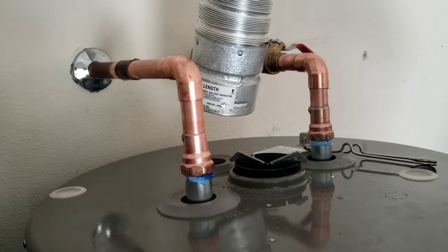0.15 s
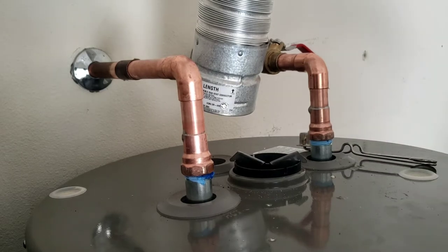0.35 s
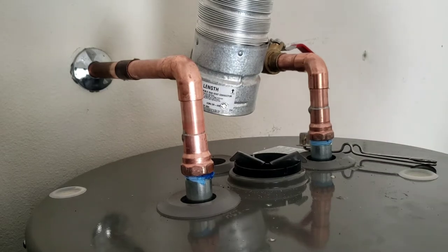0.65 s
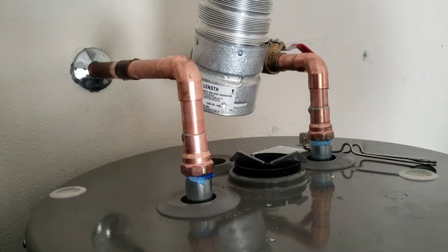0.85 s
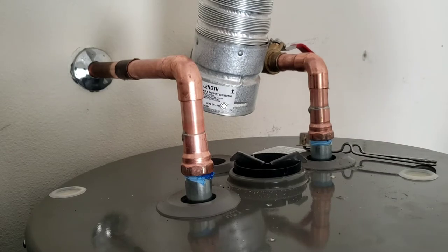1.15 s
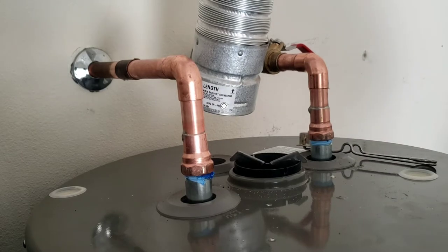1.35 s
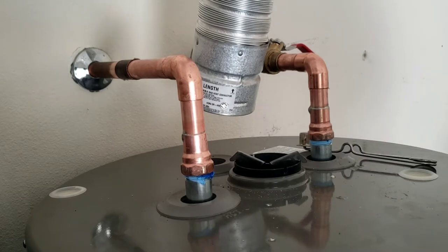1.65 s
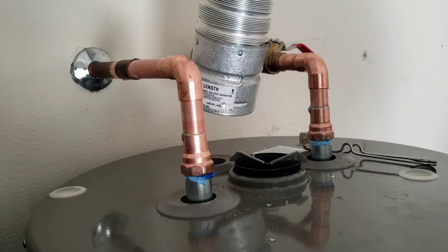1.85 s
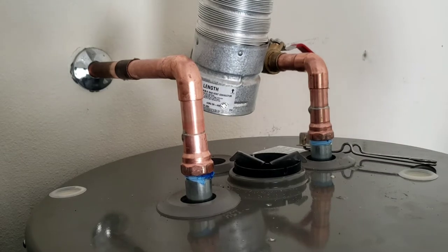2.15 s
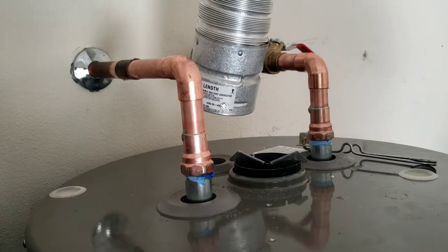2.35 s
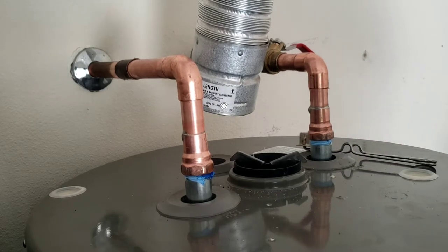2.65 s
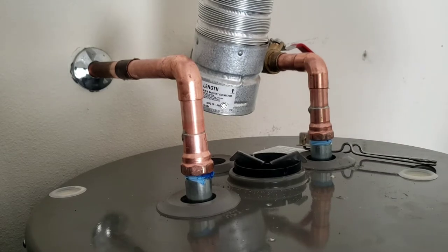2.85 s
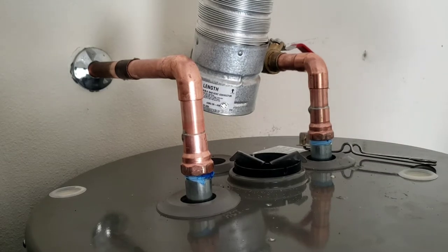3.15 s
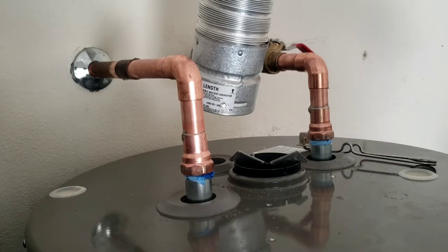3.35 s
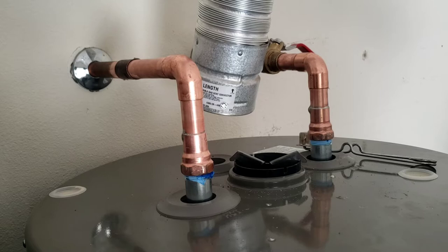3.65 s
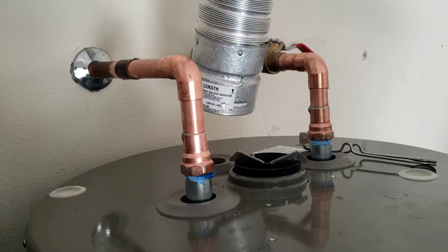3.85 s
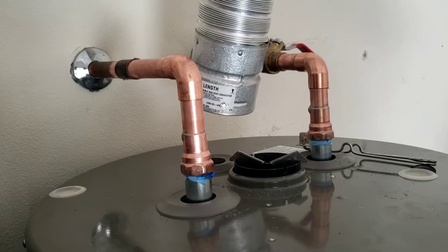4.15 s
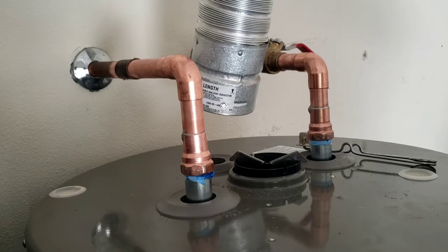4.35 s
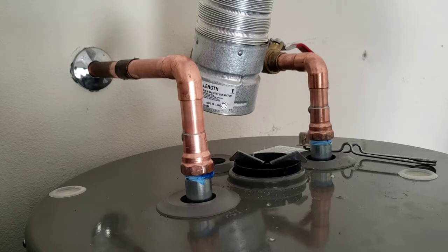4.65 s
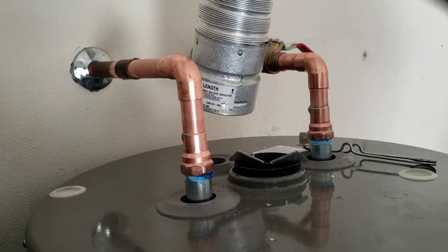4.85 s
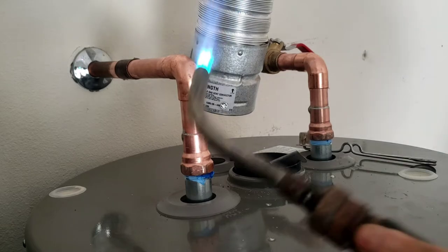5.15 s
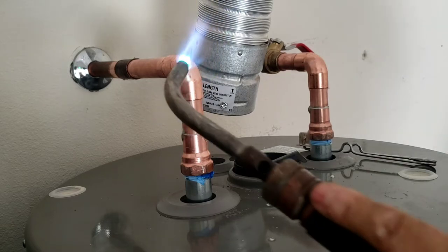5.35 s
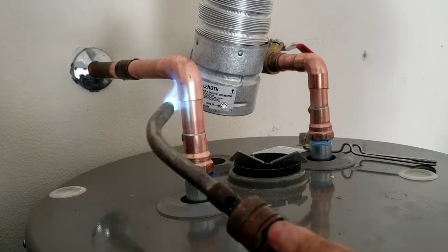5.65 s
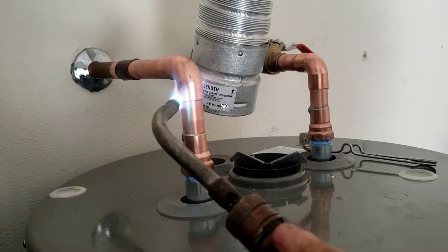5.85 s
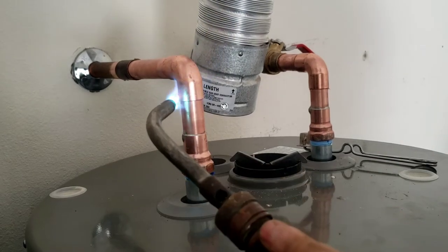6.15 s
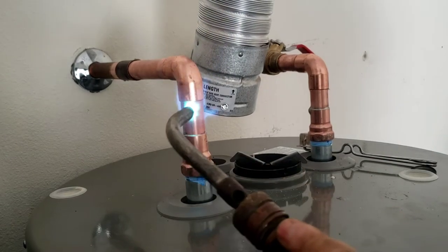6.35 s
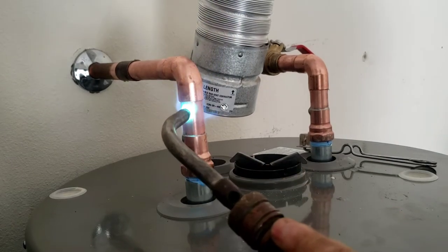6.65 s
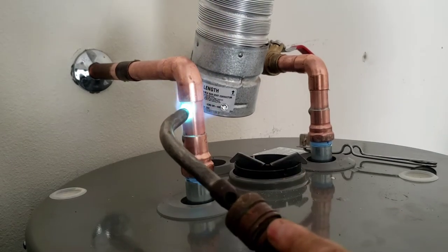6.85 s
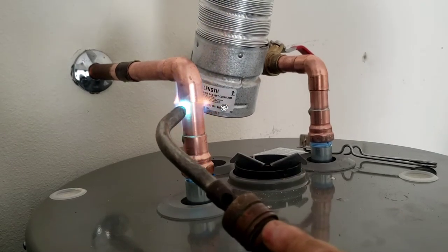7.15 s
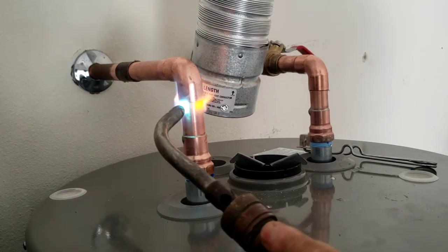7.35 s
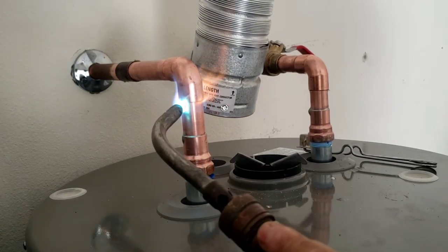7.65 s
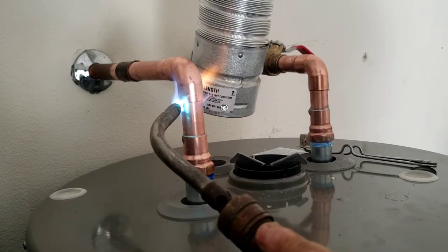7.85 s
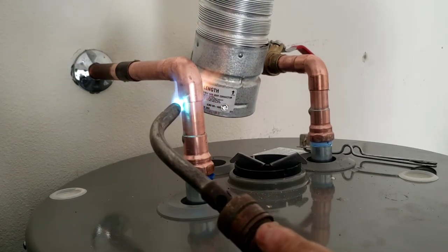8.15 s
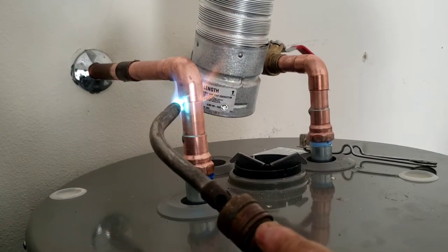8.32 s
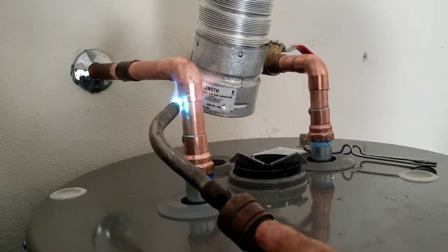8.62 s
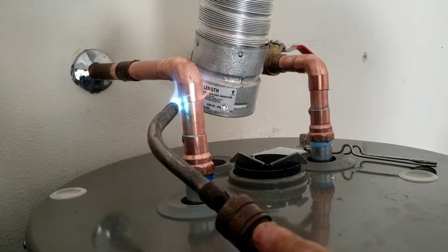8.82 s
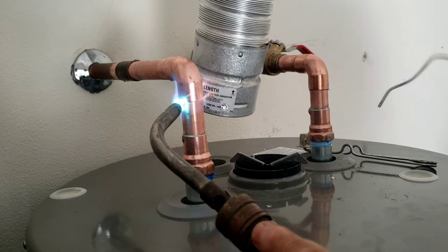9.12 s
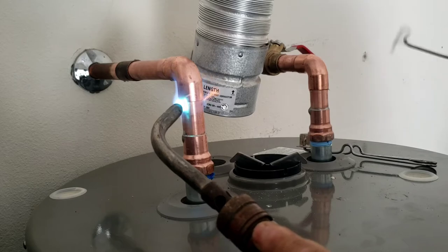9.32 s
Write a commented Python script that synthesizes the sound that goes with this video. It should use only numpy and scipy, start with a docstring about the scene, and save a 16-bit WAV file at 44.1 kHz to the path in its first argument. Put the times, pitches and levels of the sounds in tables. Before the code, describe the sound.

Close to the microphone in a cramped closet, a gas torch gives a continuous bright hiss with an unsteady whistle on top. Midway the flame flutters and roars hollowly for a moment as the torch moves, and a second, higher whistle flares. It then settles on a copper pipe, hissing on with a stronger, pulsing whistle and frequent soft low puffs.

```python
"""A hand gas torch burns in a small hard-walled closet, heard at two microphone ports with unlike treble. First
it is held aside to the right: the jet hisses through the resonances of the burner tube, which whistles near 3.2
kHz, and low noise flickers below. At about 5 s it swings in: the flame roars hollow, and a second whistle
flares. From 5.7 s it plays on a copper pipe: the hiss has a new colour, the main whistle is louder and the low
puffs come closer together."""
import sys
import numpy as np
from scipy import signal
from scipy.fft import rfft, irfft
from scipy.io import wavfile
from scipy.ndimage import uniform_filter1d, map_coordinates

SR = 44100
rng = np.random.default_rng(int(sys.argv[2]) if len(sys.argv) > 2 else 0)


def to_wav(s):
    """Save 16-bit WAV."""
    ch = np.atleast_2d(s).T  # columns
    pcm = np.round(np.clip(ch, -1, 1) * 32767)  # PCM
    wavfile.write(sys.argv[1], SR, pcm.astype(np.int16))


N = 418058
HZ = np.maximum(np.fft.rfftfreq(N, 1 / SR), 1)
SPLIT = np.array([[.5], [-.5]])   # halves a left-over-right difference between the ports


def jet(way):
    """Hiss through tube and surface resonances; the colour crossfades from aside (way 0) to pipe (1)."""
    # jet spectrum: freq_hz, level_db
    aside_spectrum = [(390, -21), (805, -18), (1120, -12.5), (1350, -15), (2580, -7.5), (3230, -7.5),
                      (4570, -10.5), (7190, -8), (8750, -13.5), (11800, -9), (14400, -21)]
    pipe_spectrum = [(390, -11), (965, -14.5), (1270, -12.5), (1590, -11), (2820, -9), (3130, -8.5),
                     (3540, -13), (4300, -9.5), (10000, -14.5), (11500, -7.5), (14400, -25.5)]
    # resonances of tube and nearby surfaces: freq_hz, width_hz, lift_db
    aside_peaks = [(1130, 130, 5), (1750, 140, 2), (2260, 200, 4), (2580, 150, -3), (2860, 70, 4),
                   (3030, 120, -2), (3200, 90, 4), (3330, 150, 3), (4100, 120, 3), (5380, 150, 3),
                   (6000, 150, 3), (6650, 250, -3), (7120, 270, 6), (8900, 600, -4), (9650, 400, 3),
                   (12150, 500, 2.5)]
    pipe_peaks = [(560, 60, 3), (1250, 170, 5), (1600, 130, -5), (2040, 90, 3), (2240, 100, 4),
                  (2600, 250, -4), (2980, 150, 3), (3110, 70, -5), (4258, 75, 7), (4650, 80, 3),
                  (5050, 80, 4), (5500, 150, 2), (6120, 150, 2), (6420, 100, 2), (7110, 150, 4),
                  (8600, 600, -3), (9780, 150, 4)]
    # port balance: freq_hz, left_over_right_db
    aside_pan = [(490, 17), (750, 4), (1140, -3.5), (1740, 3), (2660, -5), (4050, 0.5), (6170, -3),
                 (9400, 6.5), (14300, 4)]
    pipe_pan = [(490, 4), (750, 2), (1140, 2.4), (1740, 0.43), (2660, 0.5), (4050, 3.1), (6170, 1.8),
                (9400, 6.6), (14300, 8.1)]
    # resonances at one port only, left then right: freq_hz, width_hz, lift_db
    aside_port_peaks = ([(800, 110, -10.5), (2920, 250, 1.5), (4300, 150, -0.5), (5200, 300, 2.5),
                        (5840, 300, 4)], [(560, 160, -5.5), (716, 87, 6), (2550, 230, -9.5),
                        (4320, 81, 4.5), (4920, 490, 4.5), (5740, 200, 3)])
    pipe_port_peaks = ([(1360, 160, 3.5), (3500, 200, 5), (10900, 1200, -1), (13800, 600, 6.5)],
                       [(534, 130, 4), (1600, 140, -1), (11900, 500, 0), (12900, 700, 1)])
    hiss = turbulence(flicker_db=.4)
    aside = resonate(hiss * np.sqrt(1 - way), aside_spectrum, aside_peaks, aside_pan, aside_port_peaks)
    at_pipe = resonate(hiss * np.sqrt(way), pipe_spectrum, pipe_peaks, pipe_pan, pipe_port_peaks)
    return aside + at_pipe


def turbulence(flicker_db):
    """Jet noise in three flickering bands. Rows: direct sound, late sound left, late sound right."""
    # jet level and trims of its outer bands: time_s, level_db, sizzle_db, roar_db
    levels = [(0, -32.5, -3, -6), (.6, -33.5, -2, -5.5), (.95, -32, -1, -5), (1.5, -30.5, 0, -4.5),
              (1.8, -30.5, -1.5, -6), (2.1, -30, -1, -5), (2.5, -30.5, -1, -4), (3, -31, -1.5, -4.5),
              (3.3, -30.5, -1.5, -5), (3.7, -31.5, -1.5, -3.5), (4, -30, -2, -6), (4.2, -30, -1.5, -5),
              (4.5, -29.5, -2.5, -6), (4.9, -30, -2, -4), (4.99, -29.5, -2, -3), (5.12, -26.5, -2.5, -4),
              (5.19, -26.5, -3, -5), (5.27, -29, -5, -4.5), (5.36, -28, -3.5, -5.5), (5.42, -31, -4, -5),
              (5.6, -31, -4.5, -6), (6.2, -30, -3.5, -7), (7.0, -30, 0, -8.5), (7.6, -30.5, -1, -7),
              (8, -31, -1.5, -7), (8.4, -31, -0.5, -6.5), (8.9, -30, -2.5, -8), (9.48, -29.5, -0.5, -9.5)]
    level_db, sizzle_db, roar_db = in_time(levels)
    white = rfft(rng.standard_normal((3, N)))
    low = 1 / (1 + (HZ / 2900) ** 8)
    high = 1 / (1 + (8200 / HZ) ** 16)
    bands = [(low, roar_db - np.median(roar_db)), (1 - low - high, 0),
             (high, sizzle_db - np.median(sizzle_db))]
    noise = sum(irfft(white * band, N) * from_db(db + flicker_db * drift(23)) for band, db in bands)
    return from_db(level_db) * noise


def resonate(hiss, spectrum, peaks, pan, port_peaks):
    """Colours the hiss for one torch position. Axes: direct/late, port, sample."""
    colour = from_db(at_hz(spectrum) + bumps(peaks)) / (1 + (450 / HZ) ** 16)
    colour /= np.sqrt(np.mean(colour ** 2 * (HZ > 3500) * (HZ < 8000)))
    right_cavity_db = bumps([(11500, 3100, 19.6)])
    colour = colour * from_db((at_hz(pan) - right_cavity_db) * SPLIT)
    colour *= from_db([bumps(port) for port in port_peaks])
    source = rfft(hiss)
    return np.array([irfft(source[0] * colour, N), irfft(source[1:] * colour, N)])


def whistle(way, pipe_waver_hz, unrest, unrest_hz=24):
    """Tube mode pushed by turbulence; each port adds restless echoes of its own, more from aside."""
    # mode pitch: time_s, pitch_hz
    pitch = [(0, 3170), (.5, 3180), (.8, 3210), (1.3, 3180), (1.7, 3192), (2.3, 3172), (2.8, 3185),
             (4.2, 3186), (5.0, 3200), (5.3, 3175), (5.8, 3208), (6.3, 3204), (6.6, 3212), (7.4, 3220),
             (7.9, 3197), (8.4, 3202), (8.8, 3212), (9.48, 3214)]
    # mode at the ports: time_s, level_db, left_over_right_db, left_lead_rad
    levels = [(0, -31, 2, 2.5), (.25, -29, 0, 2.3), (.5, -29.5, 6, -3.5), (.75, -32, -3, 0),
              (.95, -34, -2, -3.7), (1.15, -34, 12, -2), (1.3, -33, 5, -2.5), (1.5, -27, 9, -6),
              (1.7, -32, 5, -5), (1.9, -31, 6, -4), (2.1, -28, 2, -6), (2.35, -34, 6, -4.5),
              (2.7, -32.5, 7, -4.5), (3.3, -27, -2, -2.5), (3.6, -34, 7, -3), (3.9, -24, 6, -2.5),
              (4.1, -30, -9, -2.5), (4.3, -28, 6, -2.5), (4.5, -27, 4, 1.5), (4.75, -24.5, 3, 2.5),
              (4.9, -27, -1, 2.5), (5.05, -29, 11, 1), (5.3, -26.5, 6, 3.5), (5.55, -32, 6, 3),
              (5.72, -22, 5, 1.5), (6.0, -23.5, 5, 2.5), (6.3, -21, 4.5, 2), (6.75, -24, 8, 1.5),
              (6.9, -27.5, 9.5, 2.5), (7.4, -21, 3.5, 2), (7.75, -23, 5.5, 3), (8.2, -28.5, 9.5, 2),
              (8.5, -21.5, 5, 3), (9.05, -26, 5, 2), (9.48, -23.5, 5.5, 1.5)]
    # strongest swells: middle_s, length_s, level_db
    swells = [(1.32, 0.033, -22), (1.59, 0.03, -23.5), (1.8, 0.02, -23), (1.96, 0.028, -19.5),
              (2.06, 0.034, -25), (4.63, .04, -27), (5.02, .1, -25), (5.19, 0.039, -27), (5.36, .03, -28),
              (5.68, .04, -24), (5.79, 0.022, -13.5), (5.85, 0.015, -14), (6.25, 0.084, -19.5),
              (6.41, .05, -25), (7.33, 0.051, -32), (7.63, .036, -18), (8.3, 0.048, -28),
              (8.46, 0.043, -17), (8.58, 0.065, -21), (8.7, .04, -23), (8.81, 0.033, -29),
              (8.92, 0.016, -16.5), (9.07, 0.04, -33), (9.21, 0.071, -26), (9.32, 0.035, -33),
              (9.42, 0.032, -25)]
    pitch_hz, = in_time(pitch)
    level_db, pan_db, lead_rad = in_time(levels)

    def push():
        return drift(unrest_hz) + 1j * drift(unrest_hz)

    common_share = .45 * (1 - way) + .88 * way
    common = np.sqrt(common_share) * (1 + unrest * push()) / np.sqrt(1 + 2 * unrest ** 2)
    echoes = np.sqrt((1 - common_share) / 2) * np.array([push(), push()])
    strength = from_db(level_db) * (common + echoes) + humps(swells, steepness=3)
    waver_hz = pipe_waver_hz * (1 + 2 * (1 - way)) * drift(unrest_hz / 2)
    carrier = np.exp(2j * np.pi * np.cumsum(pitch_hz + waver_hz) / SR)
    ports = from_db(SPLIT * pan_db) * np.exp(1j * SPLIT * lead_rad)
    return np.sqrt(2) * np.real(carrier * strength * ports)


def upper_whistle(lag_ms, pitch_hz=4250, width_hz=45, pan_db=9):
    """Turbulence through a fainter narrow tube mode, reaching the left port at its own moment."""
    # mode level: time_s, level_db
    levels = [(0, -65), (4.85, -51), (5.0, -26.5), (5.2, -45), (5.7, -34), (6.1, -41), (7.0, -32),
              (8.2, -37), (9.48, -48)]
    level_db, = in_time(levels)
    mode = rfft(rng.standard_normal(N)) / (1 + (2 * (HZ - pitch_hz) / width_hz) ** 2)
    tone = rms_one(irfft(mode, N)) * from_db(level_db)
    return np.array([delayed(tone, lag_ms), tone]) * from_db(SPLIT * pan_db)


def whoosh():
    """Hollow roar of the flame in the swing."""
    swells = [(4.95, .43, -34), (5.22, .19, -38)]   # middle_s, length_s, level_db
    return humps(swells, steepness=2.5) * low_band(1230, width_hz=580)


def flutter(half_depth_db):
    """Low noise: timed thuds and hum puffs, plus three bands that puff at random."""
    # soft thuds, the long one in the swing: middle_s, length_s, level_db
    thuds = [(.1, 0.037, -50), (1.17, 0.051, -56), (2.77, 0.047, -52), (2.96, 0.04, -56),
             (3.05, 0.039, -55), (3.28, 0.06, -51), (3.51, 0.042, -58), (4.71, 0.072, -59),
             (4.89, 0.067, -52), (5.09, .045, -52), (5.32, 0.31, -43.5), (5.55, 0.047, -54),
             (5.63, 0.09, -54), (6.13, 0.085, -53), (6.35, 0.098, -52.5)]
    # hum puffs: start_s, length_s, level_db
    hum = [(1.17, 0.024, -61), (1.402, 0.025, -65), (1.478, 0.082, -71), (1.687, 0.037, -58),
           (1.925, 0.032, -55), (1.985, 0.078, -52), (2.627, 0.065, -52), (3.273, 0.11, -53),
           (3.595, 0.046, -63), (4.05, 0.049, -59), (4.284, 0.037, -60), (4.49, 0.05, -56),
           (4.61, 0.11, -55), (4.74, 0.27, -52.5), (5.057, 0.39, -45.5), (5.47, .2, -50),
           (5.706, 0.19, -50), (6.012, 0.24, -47), (6.287, 0.057, -47), (6.416, 0.059, -46.5),
           (6.612, 0.082, -53), (6.775, 0.17, -49), (7.015, 0.093, -51), (7.2, 0.13, -47.5),
           (7.502, 0.13, -50), (7.655, 0.1, -50), (7.867, 0.13, -51), (8.149, 0.1, -49),
           (8.426, 0.053, -52), (8.622, 0.22, -51), (8.897, 0.17, -49), (9.065, 0.097, -48),
           (9.366, 0.091, -48)]
    # random puffs: centre_hz, ceiling_db, readiness
    burble = [(242, -49, -0.5), (352.5, -47, 0.45), (430, -48.5, 0.57)]
    # added readiness to puff, highest in the swing: time_s, readiness
    stirring = [(0, -0.34), (1.5, 0.33), (4.6, 0.68), (5.1, 1.5), (5.7, 1.14), (6.5, 0.023), (7.5, -0.46),
                (9.48, -0.31)]
    out = humps(thuds, steepness=3) * low_band(92, width_hz=42)
    puffs = [(start_s + length_s / 2, length_s, db) for start_s, length_s, db in hum]
    out += humps(puffs, steepness=6.6) * low_band(176, width_hz=48)
    stir, = in_time(stirring)
    for centre_hz, ceiling_db, readiness in burble:
        gap_db = half_depth_db * (np.tanh(2.47 * (drift(8.7) + readiness + stir)) - 1)
        out += from_db(ceiling_db + gap_db) * low_band(centre_hz, width_hz=72.5)
    return out


def bounce(x, left_from_hz=1500, right_from_hz=8500):
    """Short echo off the nearest metal; a narrow pipe returns only treble, the hand varies the path."""
    # echo path: time_s, left_ms, right_ms, left_gain, right_gain
    path = [(0, .76, .965, .15, .2), (1.3, .76, .97, .2, .3), (1.7, .76, .975, .25, .3),
            (2.1, .76, .995, .25, .55), (2.5, .76, .975, .25, .4), (3.1, .76, 1.015, .25, .3),
            (3.4, .76, .99, .25, .5), (3.7, .76, .975, .25, .2), (4.1, .76, .995, .25, .45),
            (4.6, .76, .97, .25, .2), (5.3, 1.2, .9, .05, 0), (6.2, 1.55, .79, .2, .05),
            (6.6, 1.54, .80, .15, .55), (7.2, 1.54, .827, .2, .5), (7.6, 1.54, .842, .2, .55),
            (8.0, 1.54, .86, .2, .55), (8.4, 1.54, .876, .25, .55), (8.9, 1.54, .89, .25, .4),
            (9.25, 1.54, .91, .2, .3), (9.48, 1.54, .92, .2, .4)]
    left_ms, right_ms, left_gain, right_gain = in_time(path)
    ports = [(left_ms, left_gain, left_from_hz), (right_ms, right_gain, right_from_hz)]
    out = x.copy()
    for port, (path_ms, gain, from_hz) in enumerate(ports):
        treble = irfft(rfft(x[:, port]) / (1 + (from_hz / HZ) ** 6), N)
        delay_ms = path_ms + .004 * drift(.8)
        out[:, port] += gain * np.array([delayed(row, delay_ms) for row in treble])
    return out


def closet(direct, late, t60_s=.073, first_echo_s=.002, late_share=.5):
    """Dense echoes whose pattern changes as the hand moves; the late share is too restless for one."""
    # echo tail over direct sound: freq_hz, gain_db
    tail_colour = [(300, -1.5), (1000, 3.5), (2500, 1.5), (5000, 3), (9000, 1.5), (14000, 6.5)]
    # the hand meets a new echo pattern: time_s
    shifts_s = np.concatenate([np.arange(0, 4.5, .3), np.arange(4.6, 5.9, .15), np.arange(6.1, 9.4, .22),
                [9.48]])
    t = np.arange(SR // 3) / SR
    decay = from_db(-60 * t / t60_s) * (t > first_echo_s)
    decay /= np.sqrt(np.sum(decay ** 2))
    early = np.zeros((2, N + len(t)))
    shifts = np.minimum(np.round(np.array(shifts_s) * SR).astype(int), N)
    for k in range(len(shifts)):
        start, end = shifts[max(k - 1, 0)], shifts[min(k + 1, len(shifts) - 1)]
        fade = np.sqrt(np.interp(np.arange(start, end), shifts, np.arange(len(shifts)) == k))
        tail = rng.standard_normal((2, len(t))) * decay
        early[:, start:end + len(t) - 1] += signal.fftconvolve(direct[:, start:end] * fade, tail, axes=1)
    echoes = np.sqrt(1 - late_share) * early[:, :N] + np.sqrt(late_share) * late
    return irfft(rfft(echoes) * from_db(at_hz(tail_colour)), N)


def wander(x, way, patch_s=.25, patch_hz=300):
    """Patches of the spectrum swell and sink as hand and flame stir, unlike at the two ports."""
    # colour wander: freq_hz, spread_db
    aside_spread = [(300, 2), (2000, 1.6), (4000, 2.4), (7000, 2), (12000, 1.6)]
    pipe_spread = [(300, 1.5), (2000, .8), (7000, .7), (12000, .5)]
    hz, frame_s, spectrum = signal.stft(x, SR, nperseg=1024)
    field = rng.standard_normal(spectrum.shape)
    for _ in range(2):
        field = uniform_filter1d(field, size=int(patch_s / frame_s[1] / 2), axis=2)
        field = uniform_filter1d(field, size=int(patch_hz / hz[1] / 2), axis=1)
    frame_way = np.interp(frame_s, np.arange(N) / SR, way)
    hz = np.maximum(hz, 1)[:, None]
    spread_db = at_hz(aside_spread, hz) * (1 - frame_way) + at_hz(pipe_spread, hz) * frame_way
    return signal.istft(spectrum * from_db(spread_db * rms_one(field)), SR)[1][:, :N]


def low_band(centre_hz, width_hz):
    """Noise band, partly common to the ports, stronger on the left; rms 1."""
    white = rfft(rng.standard_normal(N) + .91 * rng.standard_normal((2, N)))
    band = 1 / (1 + (2 * (HZ - centre_hz) / width_hz) ** 6)
    return rms_one(irfft(white * band, N) * from_db(SPLIT * 3.2))


def drift(rate_hz):
    """Slow noise through a double one-pole low-pass; rms 1."""
    hop = 40
    pole = np.exp(-2 * np.pi * rate_hz * hop / SR)
    slow = signal.lfilter([1], [1, -2 * pole, pole * pole], rng.standard_normal(N // hop + 2002))[2000:]
    return np.interp(np.arange(N) / hop, np.arange(len(slow)), rms_one(slow))


def humps(rows, steepness):
    """Envelope of soft-flanked swells."""
    t = np.arange(N) / SR
    return sum(from_db(db) * np.exp(-np.abs(2 * (t - middle_s) / length_s) ** steepness)
               for middle_s, length_s, db in rows)


def bumps(peaks):
    """Bell-shaped lifts and dips in dB."""
    return sum(db / (1 + (2 * (HZ - hz) / width_hz) ** 2) for hz, width_hz, db in peaks)


def delayed(x, delay_ms):
    """Moving delay."""
    return map_coordinates(x, [np.arange(N) - delay_ms * SR / 1000], order=3, mode="mirror")


def in_time(rows):
    """Columns of a curve at every sample."""
    time_s, *columns = np.transpose(rows)
    return [np.interp(np.arange(N) / SR, time_s, column) for column in columns]


def at_hz(points, hz=HZ):
    """Spectrum interpolated over log frequency."""
    freq_hz, level_db = np.transpose(points)
    return np.interp(np.log(hz), np.log(freq_hz), level_db)


def from_db(db):
    """Level to gain."""
    return 10 ** (np.asarray(db) / 20)


def rms_one(x):
    """Scale to unit rms."""
    return x / np.sqrt(np.mean(x ** 2) + 1e-20)


def scene():
    """The torch aside, swinging in, then on the pipe."""
    # swing: time_s, way_to_pipe (0-1), left_lag_ms
    swing = [(0, 0.2, 0.23), (.7, 0.06, 0.28), (4.5, 0.09, 0.27), (4.8, 0.08, 0.18), (5.05, 0.02, -0.014),
             (5.35, 0.02, -0.116), (5.7, 0.84, -0.13), (9.48, 0.94, -0.14)]
    way, lag_ms = in_time(swing)
    direct, late = bounce(jet(way))
    echoes = closet(direct, late)
    direct[0] = delayed(direct[0], lag_ms)
    whistles = whistle(way, pipe_waver_hz=3, unrest=.7) + upper_whistle(lag_ms)
    return wander(direct + echoes, way) + whistles + whoosh() + flutter(half_depth_db=26.5)


def record(dry):
    """Rounds the highest peaks, then cuts the top steeply."""
    ceiling, cutoff_hz = .8, 14520
    rounded = dry / (1 + (dry / ceiling) ** 6) ** (1 / 6)
    return signal.sosfilt(signal.ellip(16, .5, 80, cutoff_hz, fs=SR, output="sos"), rounded)


dry = scene()
out = record(dry)
to_wav(out)
```